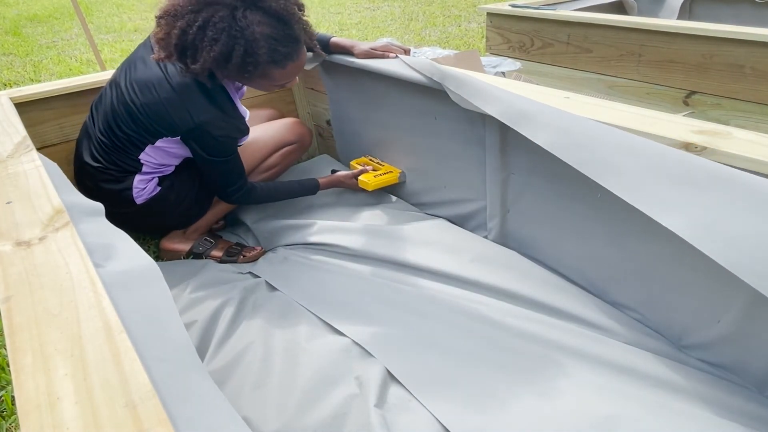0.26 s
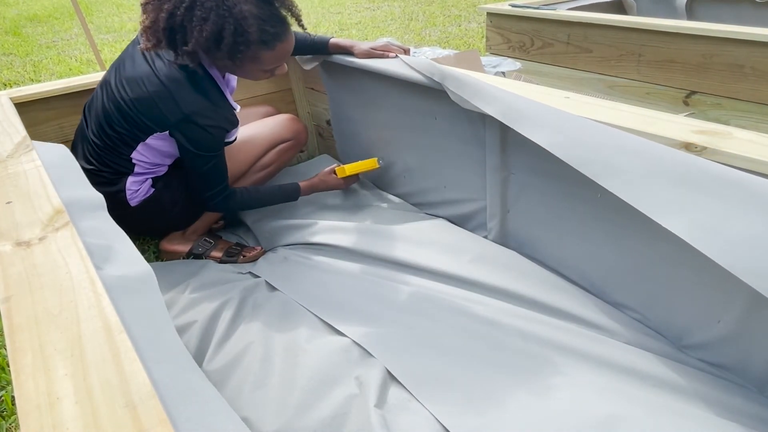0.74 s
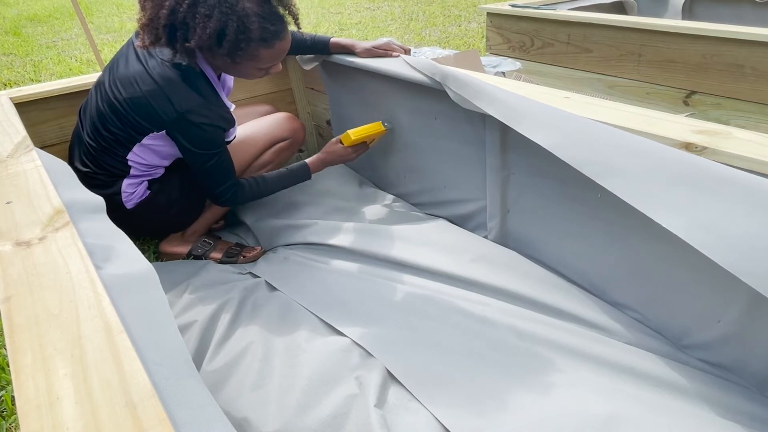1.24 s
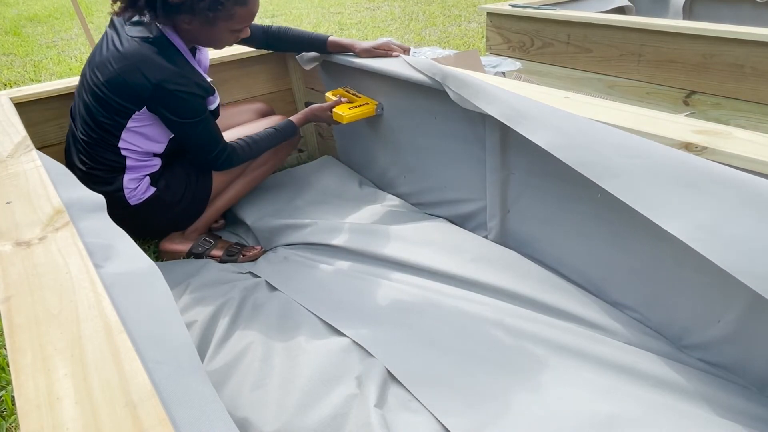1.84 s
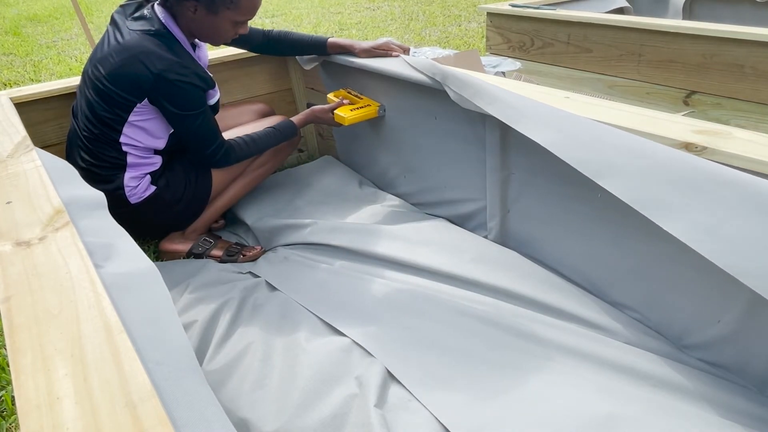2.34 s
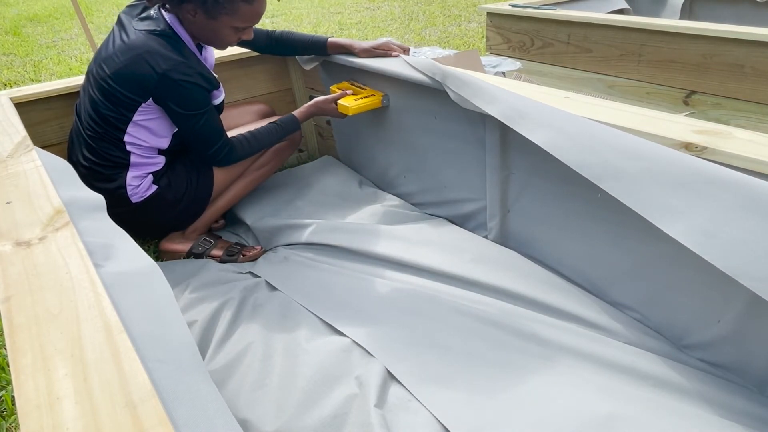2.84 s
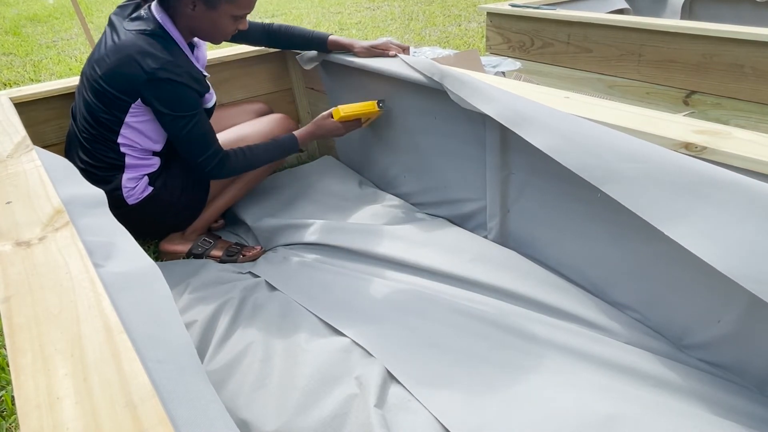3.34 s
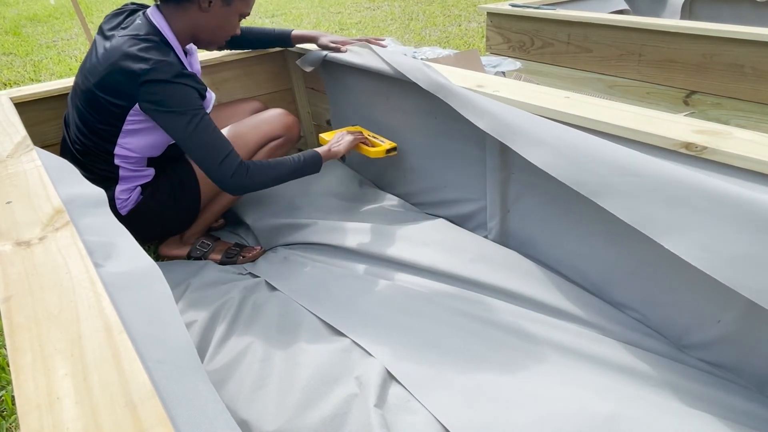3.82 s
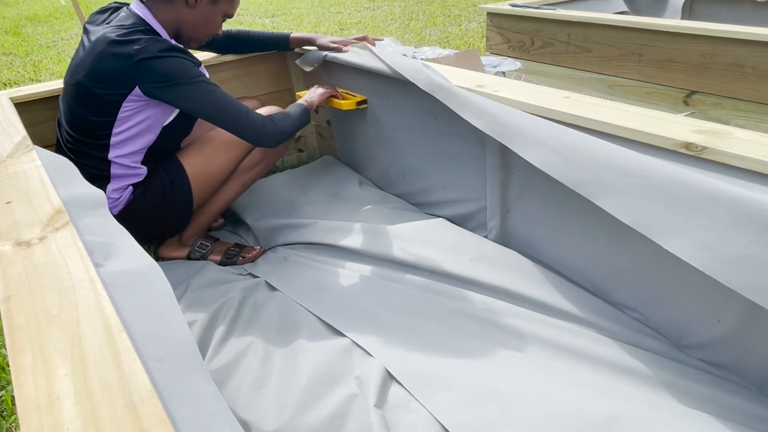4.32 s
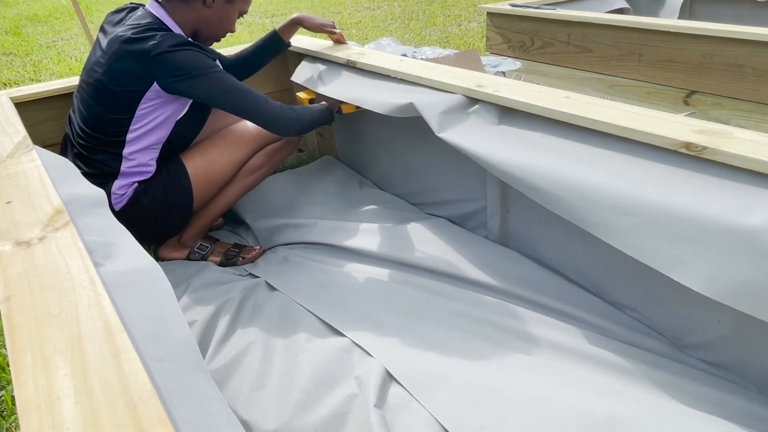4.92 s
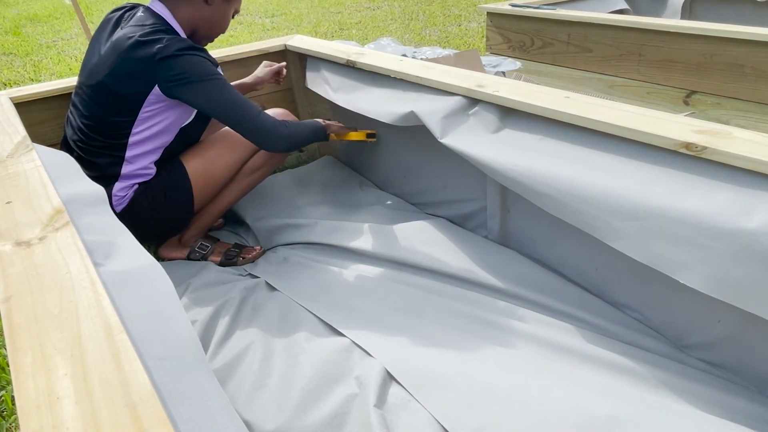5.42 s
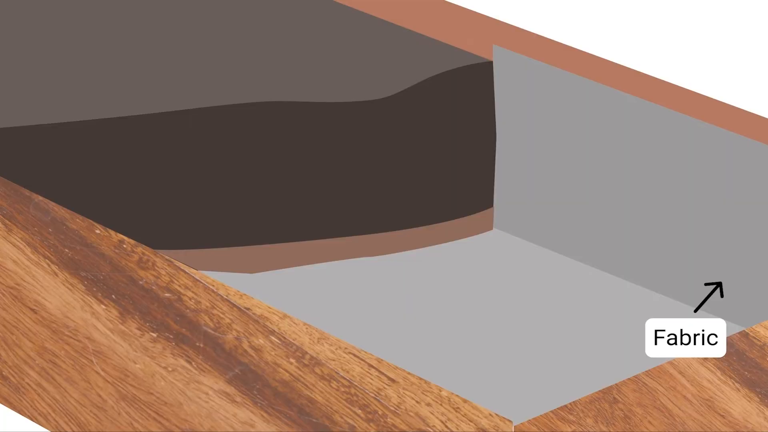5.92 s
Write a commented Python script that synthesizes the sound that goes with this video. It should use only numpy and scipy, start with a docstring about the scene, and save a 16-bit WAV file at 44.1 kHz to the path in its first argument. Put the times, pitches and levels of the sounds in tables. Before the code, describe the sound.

A hand staple gun works close to a stereo microphone outdoors, over a quiet garden hush. At about 0.2 seconds a brief rasp leads into the first shot, a sharp steel clack that thumps the wooden boards. A dull knock and a springy lever click follow near 0.5 seconds. The tool bumps softly on the wood around 1.5 seconds, and a low wind rumble swells near 2.5 seconds, staying on more gently afterwards. The second shot cracks at 3 seconds, and the lever returns hard just after it. Around 4 seconds a plastic liner faintly creaks and squeaks, with a soft knock and small ticks. The third shot lands at about 4.75 seconds, followed by light knocks, more liner creaks and squeaks near 5 seconds and a lever click at 5.3 seconds. Everything stops abruptly at about 5.75 seconds.

```python
"""Outdoors at a wooden planting bed, a stereo microphone close to a hand staple gun fixing a plastic liner.
A brief, softer rasp leads into the first shot at 0.24 s, a short steel rattle that thumps the boards; the
lever clicks and the tool knocks on the wood. Wind swells over the far garden's hush before the second
shot at 3 s, and the lever returns hard. The liner creaks and squeaks around the third shot at 4.75 s.
All sound stops at 5.75 s, shortly before the end."""
import sys
import numpy as np
from scipy import signal
from scipy.io import wavfile

SR = 44100
rng = np.random.default_rng(int(sys.argv[2]) if len(sys.argv) > 2 else 0)


def master(y):
    """Save y as 16-bit WAV."""
    cut = np.clip(np.atleast_2d(y).T, -1, 1)
    pcm = np.round(cut * 32767)  # scale
    wavfile.write(sys.argv[1], SR, pcm.astype(np.int16))


N = 272097
TIME = np.arange(N) / SR
AGE = np.arange(SR // 5) / SR   # seconds into one short event
BANDS_HZ = 25 * 2 ** (np.arange(29) / 3)
BAND_FILTERS = [signal.butter(2, [hz / 2 ** (1 / 6), hz * 2 ** (1 / 6)], "band", fs=SR, output="sos")
                for hz in BANDS_HZ]


# Three shots, then a hard return of the lever:
# start_s, low_db, wood_db, clack_db, crack_db, rattle_s, decay_factor, blow_db, wood_lag_s
SHOTS = [(0.2428, -35.5, -29, -29.5, -21, 0.0058, 0.66, -29, .005),
         (2.9755, -29.5, -27, -21, -26, 0.0044, 0.57, -32, 0.0029),
         (4.7527, -36, -26, -29.5, -22.5, 0.0073, 0.7, -28, .005),
         (3.167, -26.5, -36, -35.5, -33.5, 0.0028, 1.0, -29, 0.0029)]
# The gun's tone from close by: pitch_hz, band_level_db
GUN_COLOUR = [(60, -15.5), (120, -8.5), (220, -0.5), (450, -2), (620, -3.5), (900, -5.5), (1600, 0.5),
              (2200, 0), (3200, -2), (4500, -1.5), (7000, -3), (9500, -0.5), (12000, -4), (15500, -13.5)]
# Modes of the steel body and driver: pitch_hz, width_hz, level_db
STEEL_MODES = [(1310, 62, -3), (1850, 160, -7), (2900, 130, -3.5), (3280, 170, 1), (4150, 62, -1),
               (4720, 65, -1.5), (5170, 110, 1), (5880, 44, 0), (6120, 61, 2), (6390, 100, 3),
               (7650, 100, 2.5), (9080, 140, 2), (9570, 140, 2)]
# Ring of gun and plank at each shot's spot, one list a shot: pitch_hz, level_db, t60_s
SPOT_MODES = [
    [(400, -19, .075), (710, -22, 0.066), (2905, -14, 0.026), (3220, -12.5, 0.033)],
    [(287, -26, 0.072), (512, -16.5, 0.064), (883, -17, 0.043), (1399, -20, 0.028), (1870, -18.5, 0.025),
     (3270, -9, 0.014), (5060, -21.5, 0.035)],
    [(205, -21.5, 0.12), (479.6, -16.5, 0.081), (712, -21, .05), (857, -20, 0.061), (1064, -17.5, 0.062),
     (1394, -13.5, 0.042), (1593, -12.5, 0.033), (3466, -17.5, 0.047)],
    [(228, -23.5, 0.099), (328, -30, 0.097), (550, -20.5, 0.064), (870, -23, 0.071)],
]

def shots():
    """The driver slams down and chatters in the steel body, the staples jingle and the plank answers."""
    out = np.zeros((2, N))
    for shot, spot in zip(SHOTS, SPOT_MODES):
        start_s, low_db, wood_db, clack_db, crack_db, rattle_s, decay, blow_db, lag_s = shot
        shot_colour = [(200, low_db), (750, wood_db), (2300, clack_db), (8000, crack_db)]
        colour = at_hz(GUN_COLOUR, BANDS_HZ) + at_hz(shot_colour, BANDS_HZ)
        rattle = contact(colour, rattle_s, decay, grain_db=2, bass_lag_s=lag_s)
        staple_colour = colour - 6.5 + rolloff_db(6000 / BANDS_HZ)   # the strip jingles above 6 kHz
        jingle = contact(staple_colour, rattle_s=0.0105, decay=0.25, grain_db=2)
        # each shot favours other modes of the steel
        steel = [(hz, width_hz, db + 2 * rng.standard_normal()) for hz, width_hz, db in STEEL_MODES]
        add(out, start_s, rattle + jingle + from_db(2.5) * resonate(rattle, steel))
        for hz, db, t60_s in spot:
            add(out, start_s + wood_delay(lag_s, hz), from_db(db) * ring(hz, t60_s))
        add(out, start_s + lag_s + 0.002, from_db(blow_db) * boards(hardness_hz=1079))
    return out


# Clicks of the lever and of creases in the liner, and a brief, softer rasp leading into each shot:
# start_s, level_db, tilt_db_per_octave, length_s
CLICKS = [(0.196, -53, -0.5, 0.002), (0.2356, -35, -2, 0.0062), (0.404, -54.5, -2, 0.0064),
          (0.421, -47.5, 1, 0.004), (0.4738, -27.5, 1.5, 0.0008), (0.755, -71, 9, .002),
          (1.2974, -53, -1, .002), (2.257, -62, 3, 0.0032), (2.3753, -57, -4.5, 0.0006),
          (2.918, -47.5, 0, 0.004), (2.969, -31, -2.5, 0.0057), (3.134, -42.5, 1, 0.0022),
          (3.8658, -45.5, 0.5, 0.0028), (4, -60, 9, 0.0028), (4.051, -60.5, 9, 0.0026),
          (4.175, -68, 15, 0.0016), (4.7425, -37, 0, .002), (4.935, -51.5, 7, 0.0019),
          (4.953, -60, 8, 0.0043), (4.9728, -46.5, -8.5, 0.004), (5.012, -61, 7, .003),
          (5.033, -59, 6, 0.0037), (5.045, -60, 12.5, 0.0032), (5.084, -60, 10.5, 0.0025),
          (5.244, -64.5, 4.5, 0.0038), (5.3207, -39.5, 0, 0.0014)]
# The tone of a click: pitch_hz, band_level_db
CLICK_COLOUR = [(200, -22.5), (650, -23), (900, -10.5), (1200, -11), (2000, -9), (4500, -2.5), (7000, -6.5),
                (9500, -6.5), (12500, -14.5), (15500, -27)]

def clicks():
    """Light, short clicks and rasps, each ringing at three pitches of its own."""
    out = np.zeros((2, N))
    for start_s, db, tilt_db_per_octave, length_s in CLICKS:
        tilt_db = tilt_db_per_octave * np.log2(np.maximum(BANDS_HZ, 800) / 4000)
        tick = contact(at_hz(CLICK_COLOUR, BANDS_HZ) + tilt_db, length_s, decay=0.68, grain_db=2.5)
        modes = [(hz, hz / 10, -2) for hz in 1800 * 2 ** rng.uniform(0, 2, size=3)]
        add(out, start_s, from_db(db) * (tick + resonate(tick, modes)))
    return out


# Buzzes of the gun's return spring: start_s, pitch_hz, level_db, t60_s
SPRING_BUZZES = [(0.245, 3400, -50.5, 0.27), (0.473, 1993, -34.5, 0.052), (5.3226, 1934, -44, 0.065)]

def spring():
    """The return spring rings on; its coils touch and roughen the tone."""
    out = np.zeros((2, N))
    for start_s, hz, db, t60_s in SPRING_BUZZES:
        add(out, start_s, from_db(db - 60 * AGE / t60_s) * rough_tone(hz, width_hz=520))
    return out


# The tool knocks on the bed: start_s, level_db, hardness_hz, mode_hz, mode_db
KNOCKS = [(0.029, -30.5, 680, 459.8, 0.5), (0.129, -38.5, 420, 333, -7), (0.4240, -18, 536.6, 181, -4),
          (0.449, -36.5, 700, 335, -9), (0.498, -38, 180, 140, -6), (1.486, -33, 432, 453, -2),
          (1.618, -40, 320, 182.5, -1), (2.339, -34, 170, 129.6, -14), (2.612, -32.5, 399, 453, -7),
          (2.994, -37.5, 900, 2501, -0.5), (3.184, -27.5, 260, 170, -8), (3.872, -31.5, 460, 225, -24),
          (4.112, -39.5, 380, 200, -2.5), (4.779, -30.5, 300.2, 164.9, -13.5), (4.976, -42, 1200, 537, 10),
          (5.086, -39, 347.2, 220, 0.5)]

def knocks():
    """Blows cushioned by the liner: one push, then plank modes and a dull thud."""
    out = np.zeros((2, N))
    for start_s, db, hardness_hz, mode_hz, mode_db in KNOCKS:
        shove = from_db(6.5) * push(0.44 * hardness_hz)
        frame = from_db(-3) * boards(hardness_hz, decay=0.75)   # hand and liner shorten the ring
        plank = from_db(mode_db) * ring(mode_hz, t60_s=0.085)
        add(out, start_s, from_db(db) * (shove + frame + plank + from_db(-10) * thud(hardness_hz)))
    return out


# The tone of a cushioned blow: pitch_hz, band_level_db
THUD_COLOUR = [(60, -18), (130, -2.5), (250, 1), (500, 4.5), (900, -2), (1400, -16), (4000, -22.5),
               (15000, -32)]

def thud(hardness_hz):
    """A brief, soft contact that excites little above its hardness frequency."""
    colour = at_hz(THUD_COLOUR, BANDS_HZ) + rolloff_db(BANDS_HZ / hardness_hz)
    return contact(colour, rattle_s=0.00089, decay=0.75, grain_db=2)


def push(hz):
    """A plank gives way and springs back: one swing of pressure centred on hz."""
    phase = 2 * np.pi * hz * AGE - np.pi
    return -phase * np.exp(-phase ** 2 / 2) * np.ones((2, 1))


# Modes of the bed's plank frame, ringing freely: pitch_hz, level_db, t60_s
FRAME_MODES = [(150.4, -13.5, 0.17), (217, -12, 0.26), (224.7, -11, 0.27), (313, -8, 0.14),
               (374, -10.5, 0.04), (504, -10.5, 0.14), (520, -12, 0.072), (705, -14.5, 0.15),
               (938, -16, 0.027), (1075, -22, 0.04)]

def boards(hardness_hz, decay=1, spread_db=4.5):
    """The frame's modes, struck together but a little differently each time."""
    out = 0
    for hz, db, t60_s in FRAME_MODES:
        struck_db = db + rolloff_db(hz / hardness_hz) + spread_db * rng.standard_normal()
        out += from_db(struck_db) * ring(hz, decay * t60_s)
    return out


# How fast a contact dies at a decay factor of 1: pitch_hz, t60_s
CONTACT_DECAY = [(100, 0.14), (300, 0.094), (800, 0.12), (2000, 0.019), (3000, 0.032), (5000, 0.047),
                 (14000, 0.018)]
# How alike the close work is on both sides of the microphone: pitch_hz, correlation
WORK_LIKENESS = [(100, 0.55), (300, 1), (560, -0.13), (1000, 0.64), (1700, 0.8), (4000, -0.16),
                 (9000, 0.06), (13000, -0.1)]
# Which way a contact leans at the microphone: pitch_hz, left_minus_right_db
CONTACT_BALANCE = [(200, 3), (1000, 0), (2800, 3), (6000, 0.5), (10000, -5), (15000, 1.5)]

def contact(band_db, rattle_s, decay, grain_db, bass_lag_s=0):
    """Parts chatter for a moment in uneven micro-impacts, then their dense modes die band by band."""
    white = rng.standard_normal((2, 2, 2 * len(AGE)))
    grain = from_db(grain_db * flutter(AGE, step_samples=24))
    out = 0
    for k, (hz, sos) in enumerate(zip(BANDS_HZ, BAND_FILTERS)):
        age = np.maximum(AGE - wood_delay(bass_lag_s, hz), 0)
        attack = 1 - np.exp(-(age * min(2 * hz, 1200)) ** 2)
        t60_s = decay * at_hz(CONTACT_DECAY, hz)
        envelope = attack * from_db(-60 * np.maximum(age - rattle_s, 0) / t60_s)
        noise = signal.sosfilt(sos, white[k % 2])[:, len(AGE):]
        band = stereo(noise * envelope * (grain if hz > 1500 else 1), at_hz(WORK_LIKENESS, hz))
        band *= np.sqrt(np.sum(envelope ** 2) / np.sum(band ** 2, axis=1, keepdims=True))
        pan_db = at_hz(CONTACT_BALANCE, hz) * np.array([[0.5], [-0.5]])
        out += from_db(band_db[k] + pan_db) * band
    return out


def ring(hz, t60_s):
    """One struck mode, reaching left and right with a phase gap that depends on its pitch."""
    half_gap = np.arccos(np.clip(at_hz(WORK_LIKENESS, hz), -1, 1)) / 2
    tone = np.sin(2 * np.pi * hz * AGE + np.array([[-half_gap], [half_gap]]))
    attack = 1 - np.exp(-(AGE * hz * 3.2) ** 2)
    return tone * attack * from_db(-60 * AGE / t60_s)


def wood_delay(lag_s, hz):
    """Below about 685 Hz the heavy wood moves later than the steel."""
    return lag_s / (1 + (hz / 685) ** 2)


# Strokes of the hand over the liner: start_s, length_s, level_db
STROKES = [(2.201, 0.069, -52.5), (3.882, 0.034, -51.5), (3.996, 0.2, -53.5), (4.972, 0.02, -56.5),
           (5.034, 0.049, -43)]
# Resonances of the liner against the boards: pitch_hz, width_hz, level_db
LINER_MODES = [(201, 100, 8), (303.8, 51, 1), (512, 82, 5), (800, 530, -4), (1200, 240, -9),
               (1480, 250, -10.5), (1680, 400, -15.5), (3180, 1100, -21), (5500, 6600, -28)]

def liner(slips_per_s=1600, spread_db=4, attack_s=0.063, release_s=0.019):
    """The stiff sheet creaks over the wood in dense, uneven jerks as each stroke swells and fades."""
    slips = (rng.random((2, N)) < slips_per_s / SR) * rng.choice([-1, 1], (2, N))
    slips = slips * from_db(spread_db * rng.standard_normal((2, N)))
    creak = rms_one(resonate(stereo(slips + 1e-18, 0.82), LINER_MODES, order=2))
    speed = 0
    for start_s, length_s, db in STROKES:
        before_s = np.maximum(start_s - TIME, 0)
        after_s = np.maximum(TIME - start_s - length_s, 0)
        speed += from_db(db) * np.exp(-before_s / attack_s - after_s / release_s)
    return speed * from_db(2 * drift(per_s=98)) * creak


# The liner squeaks as it is dragged: start_s, length_s, first_hz, last_hz, level_db
SQUEAKS = [(0.316, 0.013, 1780, 1380, -53.5), (3.869, .07, 1053, 1110, -55), (3.958, 0.14, 1700, 1737, -60),
           (5.005, 0.09, 1680, 1767, -52.5)]

def squeaks():
    """Stick and slip of the sheet: a rough, narrow tone that glides as the pull changes."""
    out = np.zeros((2, N))
    for start_s, length_s, first_hz, last_hz, db in SQUEAKS:
        progress = np.minimum(AGE / length_s, 1)
        tone = rough_tone(first_hz + (last_hz - first_hz) * progress, width_hz=340)
        arch = 2 * np.sqrt(progress * (1 - progress))
        add(out, start_s, from_db(db) * arch * tone)
    return out


def echoes(sound, t60_s, top_hz, build_s):
    """Diffuse reflections that build up and die away, dulled at the top."""
    age = TIME[:SR]
    tail = rng.standard_normal((2, SR)) * from_db(-60 * age / t60_s)
    tail *= 1 - np.exp(-(age / build_s) ** 2)
    tail /= np.sqrt(np.sum(tail ** 2) / 2)
    dull_tail = signal.sosfilt(signal.butter(1, top_hz, fs=SR, output="sos"), tail)
    return signal.fftconvolve(sound, dull_tail, axes=1)[:, :N]


# Strength of the wind at the microphone: time_s, level_db
GUSTS = [(0.5, -52), (1.1, -56.5), (1.85, -57), (2.45, -38.5), (3.0, -50), (3.65, -44.5), (4.45, -45.5),
         (5.4, -43.5)]
# The wind's rumble: pitch_hz, density_db
WIND_SPECTRUM = [(20, -35.5), (35, -17), (50, -1.5), (63, 2), (77, -0.5), (100, -8), (140, -13.5),
                 (220, -22.5), (400, -37.5), (1000, -70.5)]

def wind():
    """Lumpy rumble that rises and falls with the gusts, a little stronger on the left."""
    gust_db = np.interp(TIME, *np.transpose(GUSTS))
    rumble = air_noise(WIND_SPECTRUM, waver_db=2, per_s=10)
    return from_db(gust_db) * rumble * from_db([[0.8], [-0.8]])


# The garden from a distance: pitch_hz, density_db
HUSH_SPECTRUM = [(60, -29.5), (110, -4.5), (230, -4), (330, -11), (500, -12.5), (850, -7), (1200, -15),
                 (1700, -23.5), (2700, -25.5), (4900, -35), (6500, -36), (7800, -40.5), (9800, -43),
                 (12500, -61)]

def garden_hush():
    """The quiet, nearly steady hush of the far garden."""
    return from_db(-54.5) * air_noise(HUSH_SPECTRUM, waver_db=0.4, per_s=5)


# How alike the open air is on both sides of the microphone: pitch_hz, correlation
AIR_LIKENESS = [(50, -0.3), (130, 0.99), (290, 0.3), (640, -0.26), (1400, -0.5), (3100, 0.2), (7000, -0.7)]

def air_noise(spectrum, waver_db, per_s):
    """Third-octave bands of stereo noise, each wavering on its own; rms 1."""
    white = rng.standard_normal((2, 2, N))
    top_hz = 2 * spectrum[-1][0]
    out = 0
    for k, (hz, sos) in enumerate(zip(BANDS_HZ, BAND_FILTERS)):
        if hz < top_hz:
            band = stereo(signal.sosfilt(sos, white[k % 2]), at_hz(AIR_LIKENESS, hz))
            out += band * from_db(at_hz(spectrum, hz) + waver_db * drift(per_s))
    return rms_one(out)


# Peaks in the microphone's own noise: pitch_hz, width_hz, level_db
HISS_PEAKS = [(6460, 1400, 2), (9570, 2300, 0)]

def microphone_hiss():
    """A faint, high hiss under everything."""
    return from_db(-75.5) * rms_one(resonate(rng.standard_normal((2, N)), HISS_PEAKS, order=2))


def rough_tone(hz, width_hz):
    """A stereo tone whose strength and phase waver over the given width; rms 1."""
    n = len(AGE)
    phase = 2 * np.pi * np.cumsum(hz * np.ones(n)) / SR
    pair = [drift(width_hz)[:n] * np.sin(phase) + drift(width_hz)[:n] * np.cos(phase) for _ in range(2)]
    return rms_one(stereo(pair, 0.4))


def resonate(sound, peaks, order=1):
    """Parallel resonances; a higher order deepens the valleys between them."""
    out = 0
    for hz, width_hz, db in peaks:
        section = np.concatenate(signal.iirpeak(hz, hz / width_hz, fs=SR))
        out += from_db(db) * signal.sosfilt([section] * order, sound)
    return out


def stereo(pair, correlation):
    """Two unrelated signals become left and right of a given likeness."""
    correlation = np.clip(correlation, -0.99, 0.99)
    mid = np.sqrt((1 + correlation) / 2) * pair[0]
    side = np.sqrt((1 - correlation) / 2) * pair[1]
    return np.array([mid + side, mid - side])


def drift(per_s):
    """Smooth random wander of spread about 1."""
    knots = rng.standard_normal(2048)
    return np.interp(TIME * per_s, np.arange(len(knots)), knots)


def flutter(times, step_samples):
    """Fast random wander, with a new value every few samples."""
    knot_times = times[::step_samples]
    return np.interp(times, knot_times, rng.standard_normal(len(knot_times)))


def rolloff_db(ratio):
    """Flat below a frequency ratio of 1, falling 12 dB an octave above it."""
    return -10 * np.log10(1 + ratio ** 4)


def at_hz(table, hz):
    """Read a table on a log-frequency axis."""
    pitches_hz, values = np.transpose(table)
    return np.interp(np.log(hz), np.log(pitches_hz), values)


def add(out, start_s, sound):
    """Mix a sound in at its start time."""
    start = int(round(start_s * SR))
    out[:, start:start + sound.shape[1]] += sound[:, :N - start]


def from_db(db):
    """Decibels to gain."""
    return 10 ** (np.asarray(db) / 20)


def rms_one(sound):
    """Scale to unit rms."""
    return sound / np.sqrt(np.mean(sound ** 2) + 1e-30)


def scene():
    """Close work in the bed, the near plank walls and the far garden answering, open air behind."""
    work = shots() + clicks() + spring() + knocks() + liner() + squeaks()
    walls = from_db(-18) * echoes(work, t60_s=0.075, top_hz=4953, build_s=0.016)
    scattered = work * rms_one(flutter(TIME, step_samples=20))   # far echoes keep no clear pitch
    garden = from_db(-31) * echoes(scattered, t60_s=0.62, top_hz=5200, build_s=0.065)
    return work + walls + garden + wind() + garden_hush() + microphone_hiss()


def record(dry):
    """The loudest peaks are rounded, the sound stops abruptly and the top is cut."""
    ceiling, end_s, fade_s, stopband_hz = 0.75, 5.748, 0.0051, 16800
    rounded = ceiling * np.tanh(dry / ceiling)
    running = np.clip((end_s - TIME) / fade_s, 0, 1)
    lowpass = signal.cheby2(14, 60, stopband_hz, fs=SR, output="sos")
    return signal.sosfilt(lowpass, rounded * running + 1e-18)


dry = scene()
out = record(dry)
master(out)
```